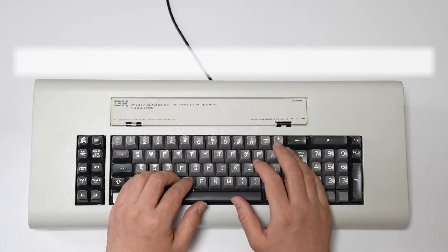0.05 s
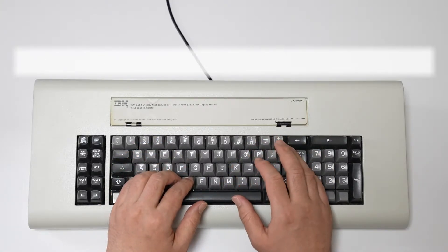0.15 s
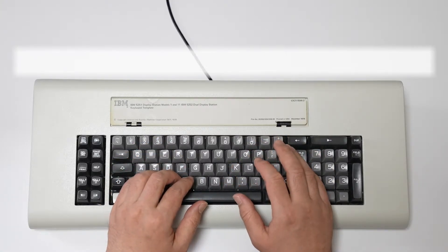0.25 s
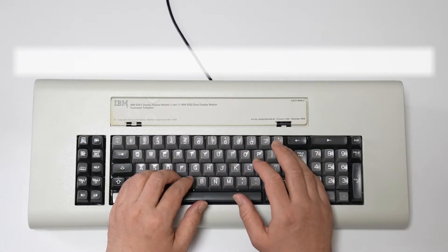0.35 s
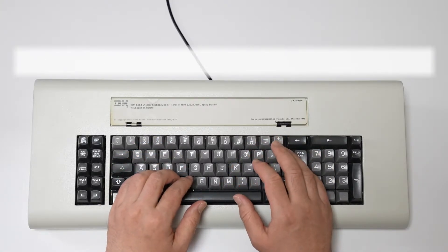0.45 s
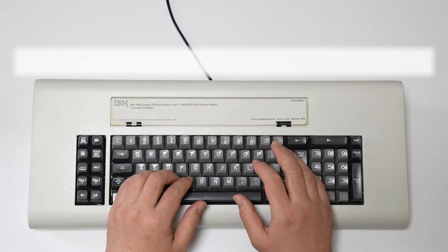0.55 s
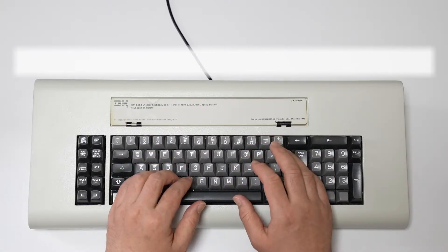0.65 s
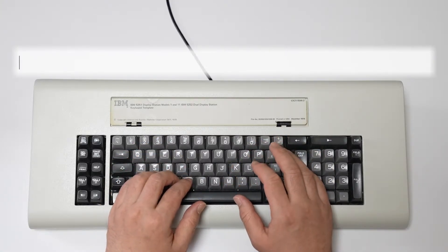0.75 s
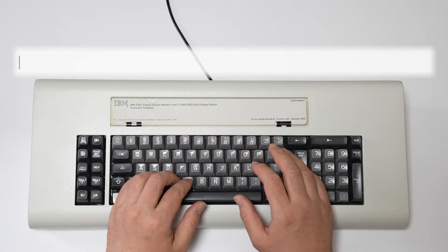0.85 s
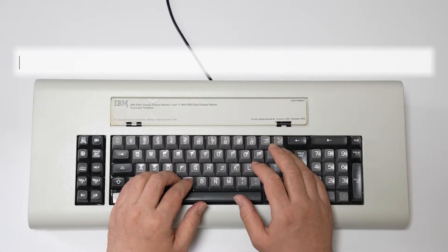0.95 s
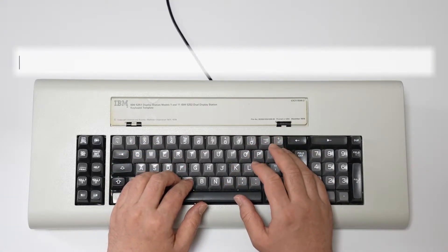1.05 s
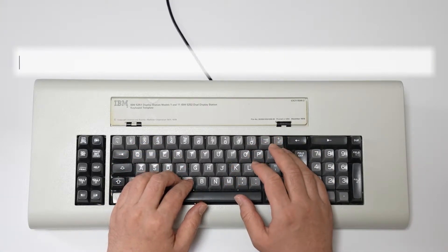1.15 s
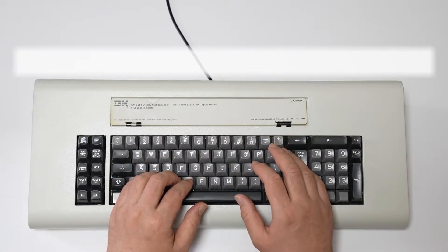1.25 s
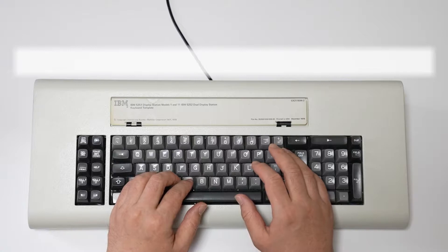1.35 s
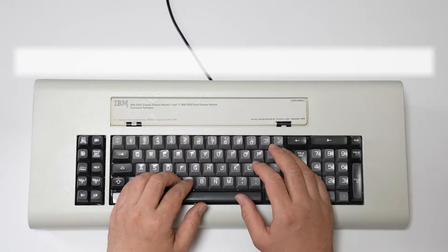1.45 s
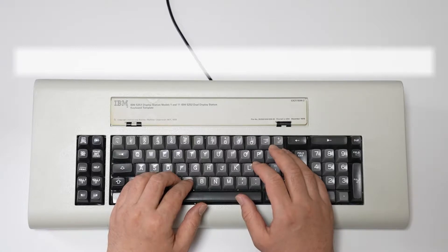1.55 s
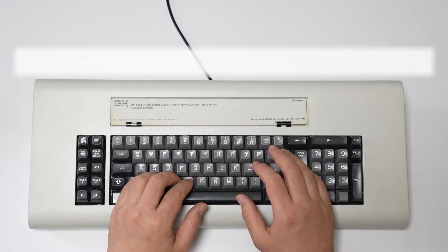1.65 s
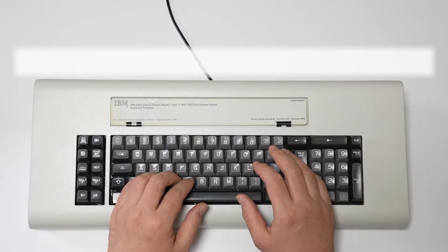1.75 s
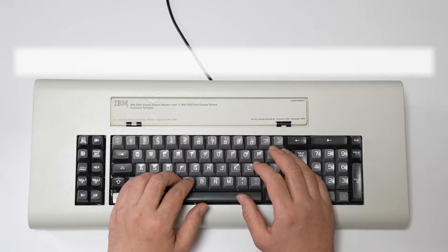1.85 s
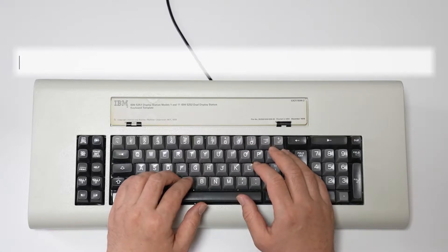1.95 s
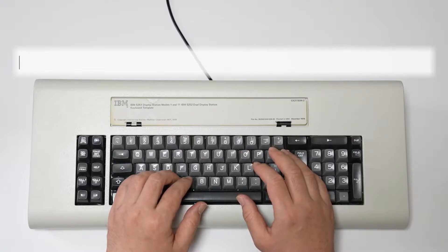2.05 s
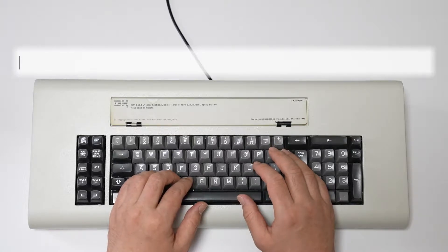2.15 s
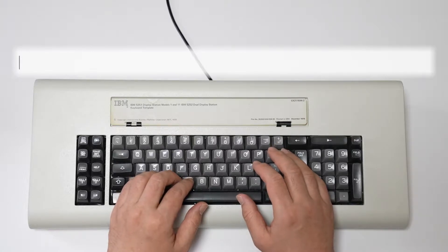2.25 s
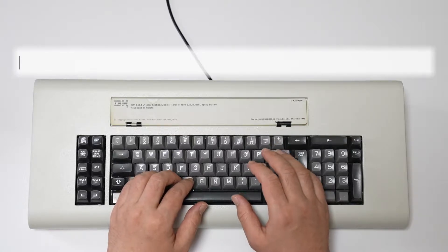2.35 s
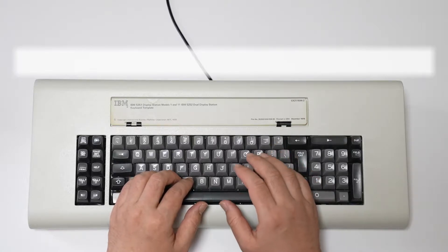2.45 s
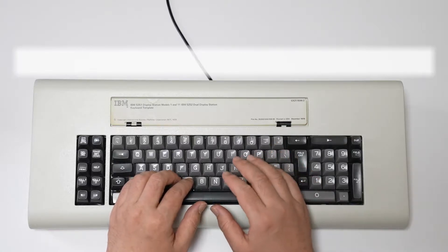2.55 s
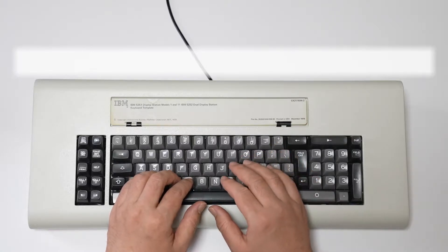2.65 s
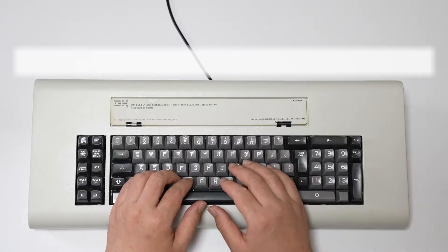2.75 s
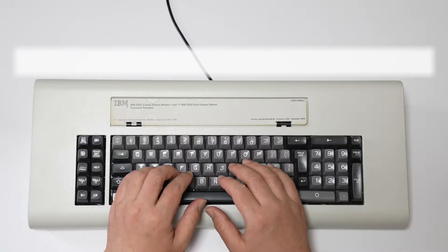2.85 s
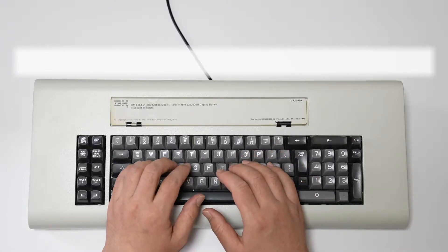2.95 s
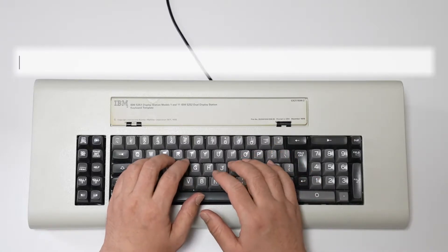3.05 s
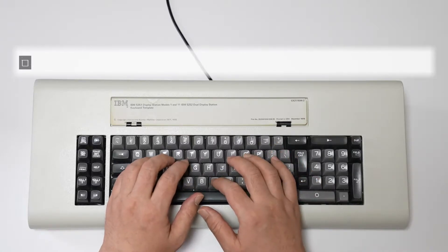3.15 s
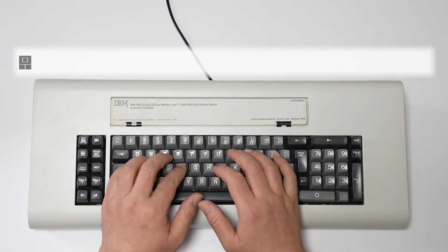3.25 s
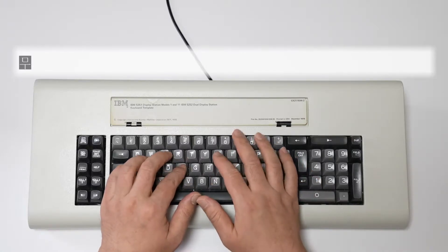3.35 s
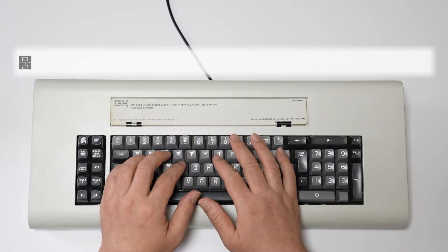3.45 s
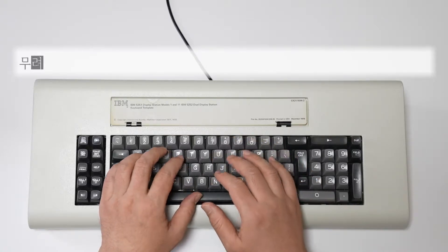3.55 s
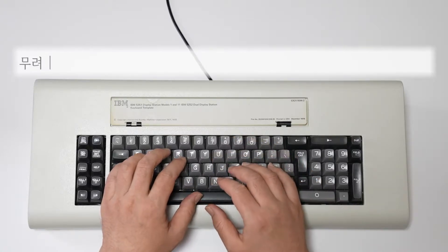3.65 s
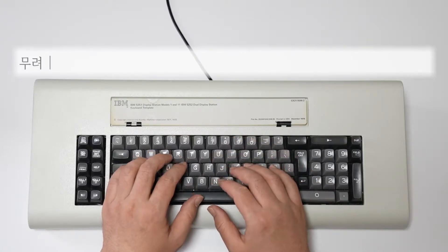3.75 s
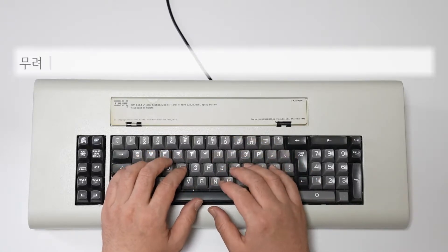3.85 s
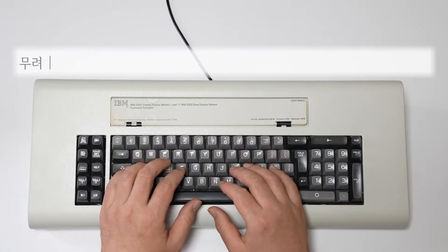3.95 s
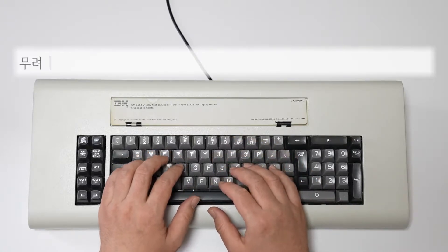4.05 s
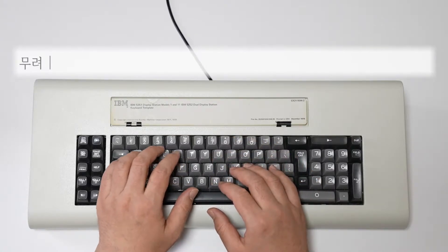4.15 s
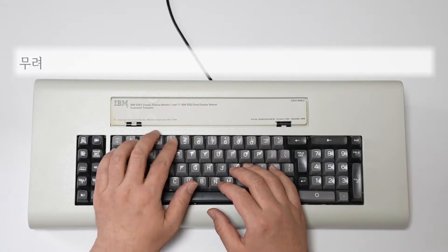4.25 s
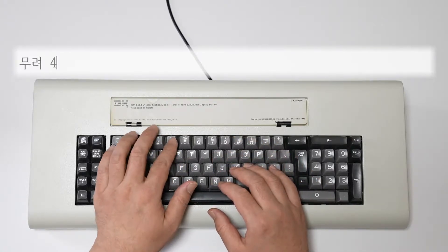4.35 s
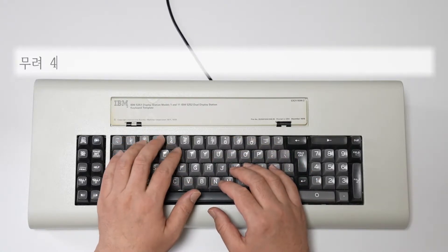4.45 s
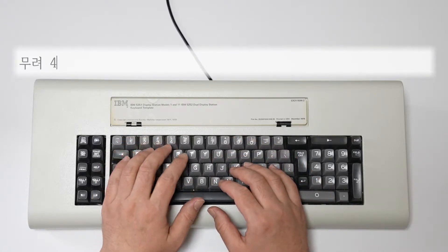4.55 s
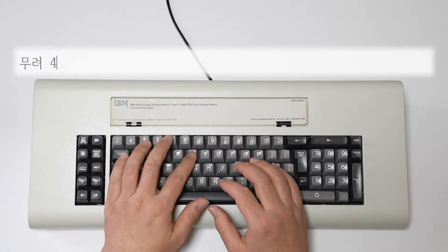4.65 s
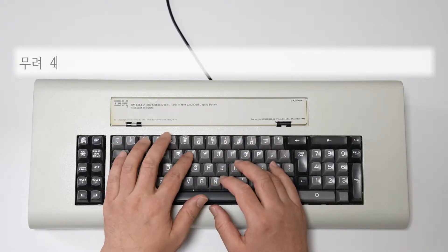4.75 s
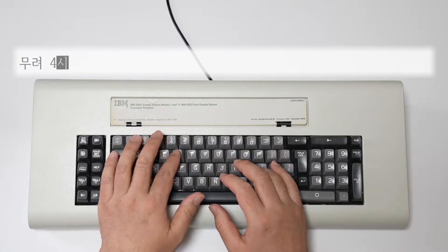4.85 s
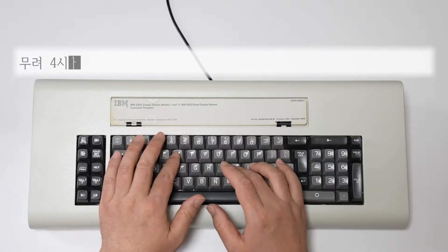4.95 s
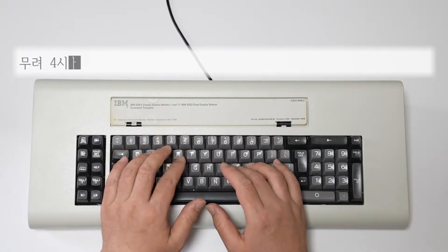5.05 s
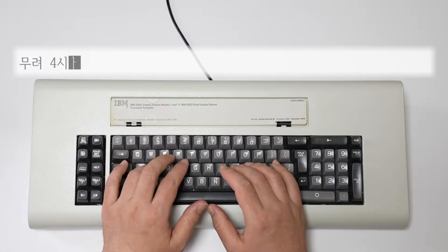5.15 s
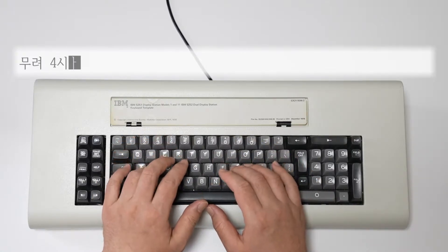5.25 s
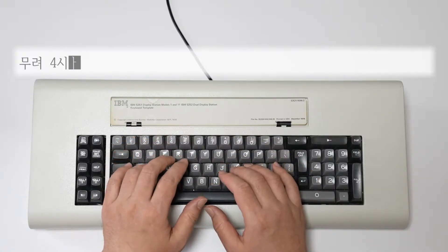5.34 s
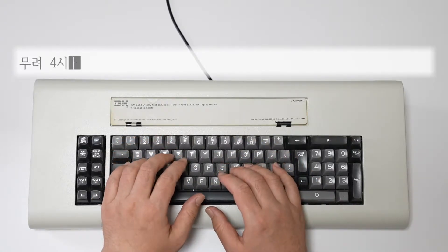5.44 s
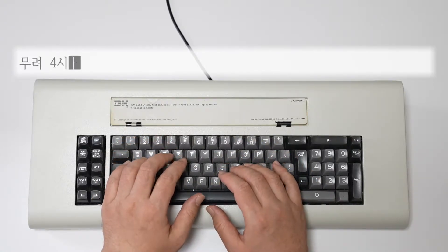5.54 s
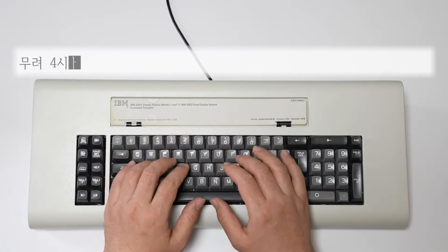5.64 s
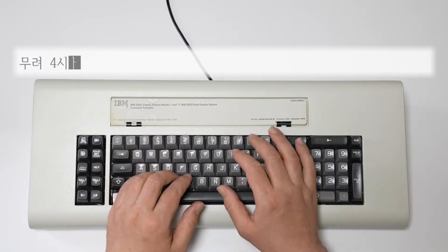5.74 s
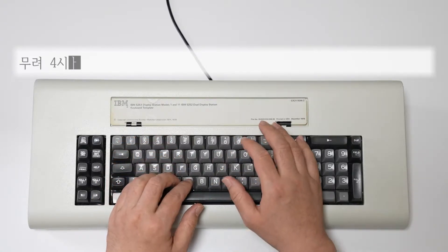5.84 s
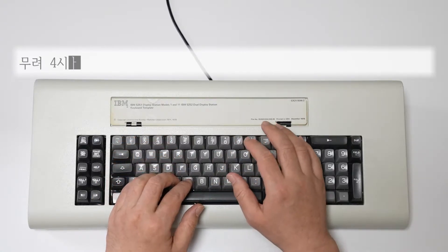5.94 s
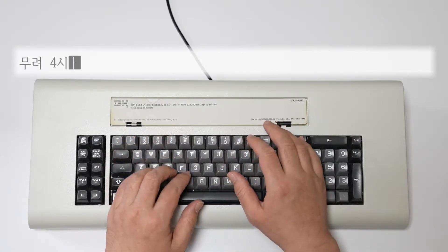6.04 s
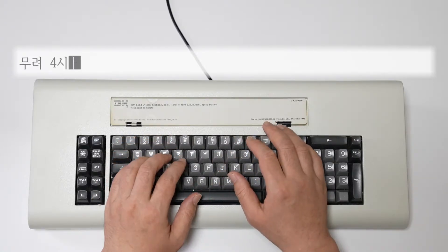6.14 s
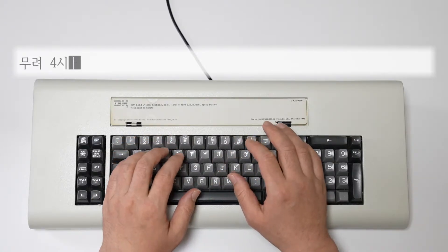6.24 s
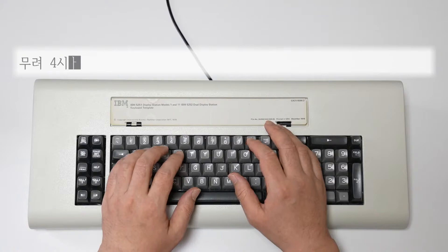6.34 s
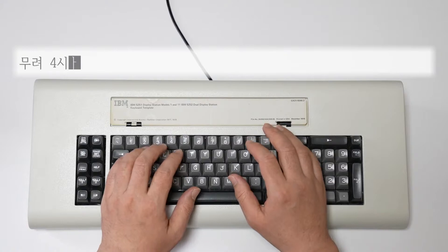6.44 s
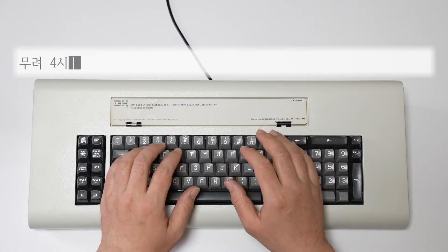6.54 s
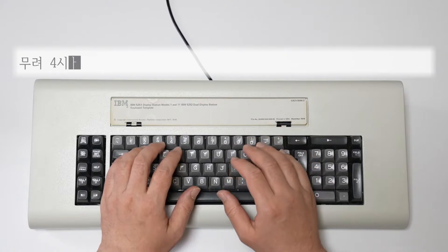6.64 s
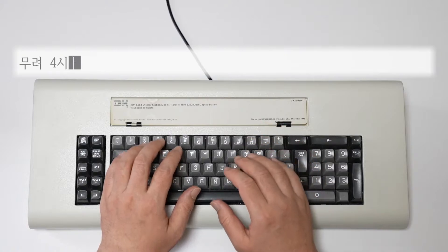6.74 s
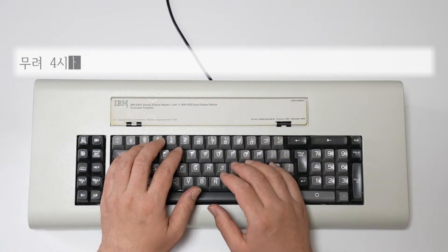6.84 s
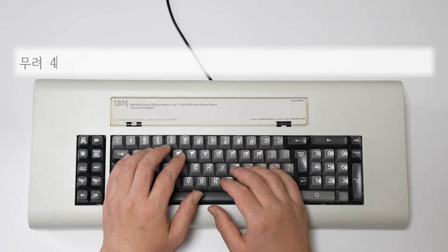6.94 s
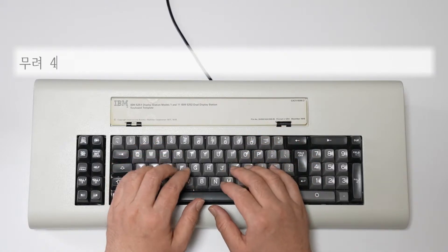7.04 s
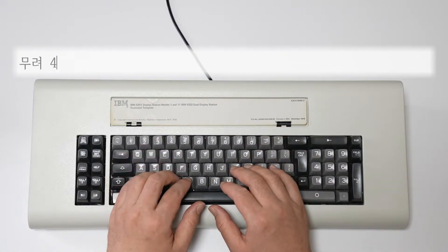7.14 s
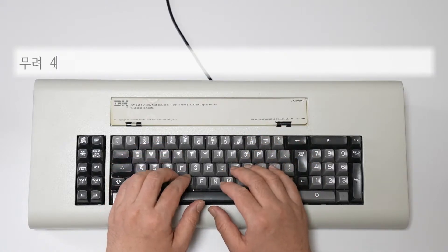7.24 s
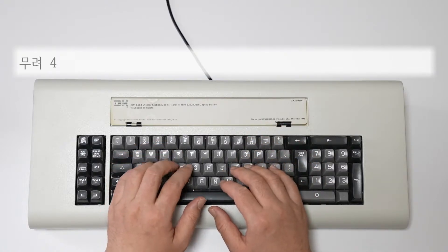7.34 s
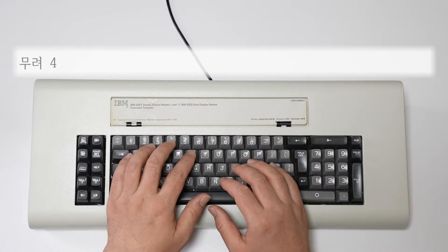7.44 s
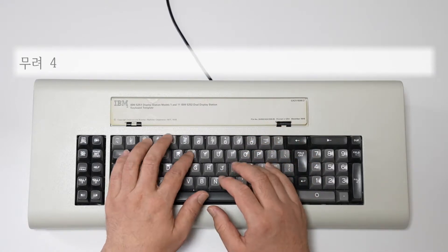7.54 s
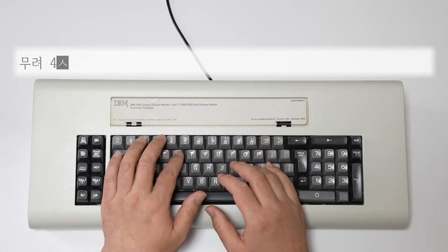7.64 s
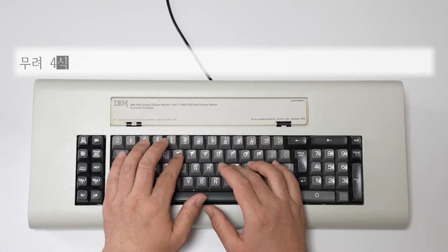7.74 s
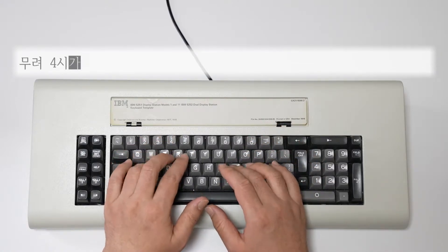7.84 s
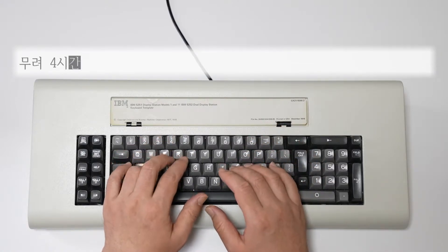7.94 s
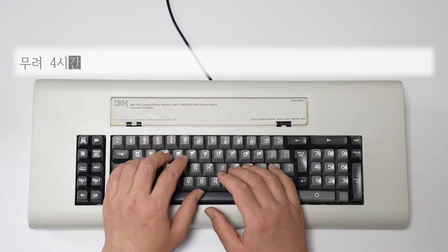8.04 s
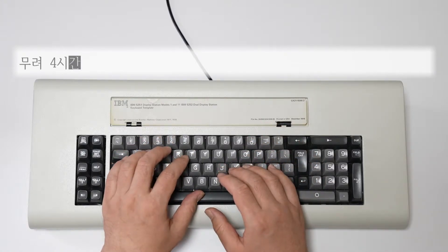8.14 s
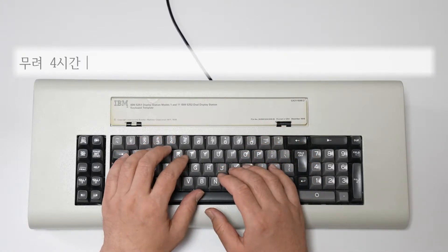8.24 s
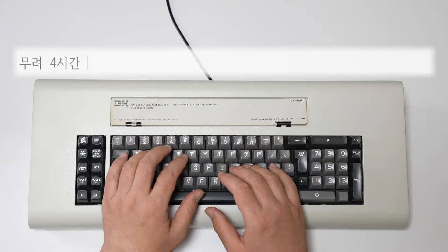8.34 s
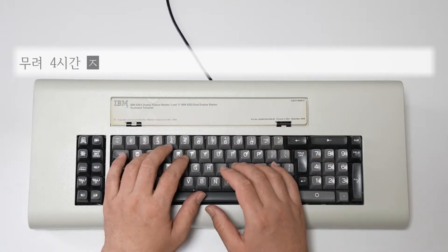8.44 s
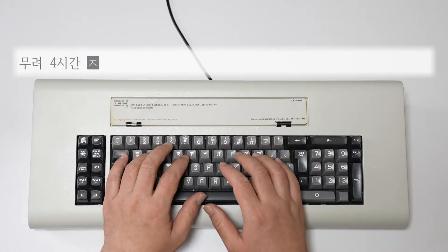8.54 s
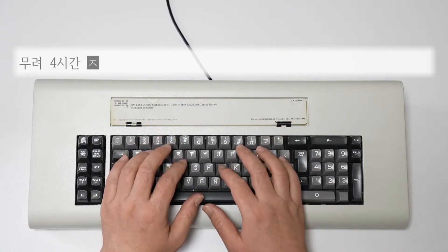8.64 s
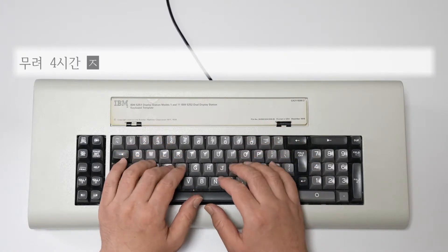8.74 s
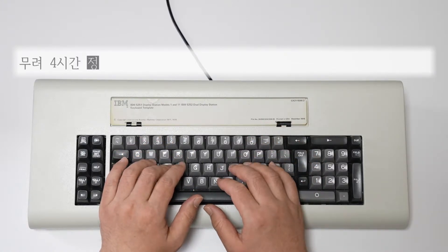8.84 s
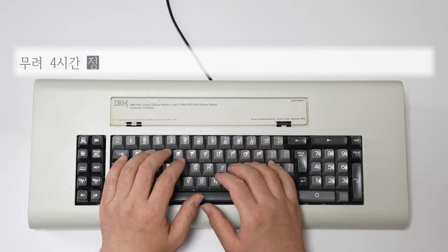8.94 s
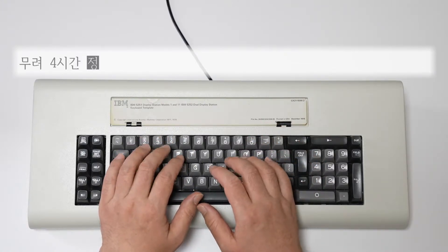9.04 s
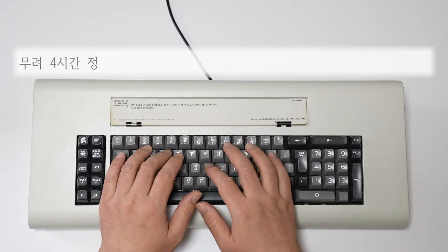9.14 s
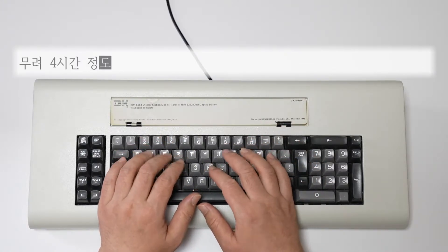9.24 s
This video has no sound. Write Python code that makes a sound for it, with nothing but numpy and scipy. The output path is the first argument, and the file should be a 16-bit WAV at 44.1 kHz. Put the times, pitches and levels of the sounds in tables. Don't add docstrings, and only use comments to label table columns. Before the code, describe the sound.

Close, dry, loud key clacks, each a snap down and a clack back up, with plastic, steel and thin spring ringing. After one early keystroke there is a long pause, then quick clusters, slower single strokes, and more clusters. Behind, muffled traffic, low engine drones, faint hum, a distant motor whine and soft hiss.

```python
import sys
import numpy as np
from scipy import signal
from scipy.fft import rfft, irfft, next_fast_len
from scipy.io import wavfile
from scipy.ndimage import uniform_filter1d

SR = 44100
rng = np.random.default_rng(int(sys.argv[2]) if len(sys.argv) > 2 else 0)


def generate_wav(signal):
    frames = np.transpose(np.atleast_2d(signal))
    scaled = np.clip(frames, -1, 1) * 32767
    pcm = np.round(scaled).astype(np.int16)
    wavfile.write(sys.argv[1], SR, pcm)


def gain_from_decibels(decibels):
    exponent = np.asarray(decibels, float) / 20
    return 10 ** exponent


N = 409688
RING = int(.22 * SR)

# pitch_hz, level_db (per Hz)
TRAFFIC_COLOUR = [(41, -38.5), (70, -4.5), (130, -4), (193, -9.5), (243, -3), (264, -16), (291, -5),
                  (331, -8.5), (378, -8), (410, -10), (524, -12), (829, -10.5), (1400, -17), (1550, -14.5),
                  (1750, -11.5), (2050, -17.5), (3500, -38.5), (4550, -55), (7700, -120)]
# pitch_hz, level_db (per Hz)
HISS_COLOUR = [(1470, -8), (2500, -3), (4240, -7.5), (6600, -7), (10900, -10.5), (13300, -9.5),
               (16000, -10.5)]
HISS_DB = -59.5
# pitch_hz, likeness (1 = same, 0 = unrelated)
LIKENESS = [(60, -0.37), (240, 0.049), (950, 0.338), (3770, 0.197), (15000, -0.0019)]
# closest_s, peak_db, rise_s, fall_s
TRAFFIC_PASSES = [
    (2.2, -63, 1.61, 2.87),
]
TRAFFIC_REST_DB = -51.5
# closest_s, peak_db, rise_s, fall_s
DEEP_PASSES = [
    (.35, -49, 0.265, 0.71),
    (1.5, -48.5, 0.274, 0.84),
]
DEEP_REST_DB = -57
# closest_s, peak_db, rise_s, fall_s
HIGHER_PASSES = [
    (1.4, -68, .15, .3),
    (5.7, -51, 0.9, 0.38),
    (8.8, -61, 0.29, 0.285),
]
HIGHER_REST_DB = -59.5
# pitch_hz, width_hz, level_db
ENGINE_DRONES = [(43.2, 2.88, -3.5), (57.97, 1, -3)]
# pitch_hz, width_hz, level_db
BUILDING_DRONE = [(28.2, 6.04, -56)]
# pitch_hz, level_db
MAINS = [(120, -60.5), (240, -68)]
# time_s, pitch_hz, level_db
FAR_MOTOR = [(0, 373.8, -100), (2.2, 385.3, -59.5), (2.6, 373.5, -64), (3.2, 368.4, -55), (3.7, 363.3, -55),
             (4.7, 350.8, -55.5), (5.2, 366, -70), (9.29, 358.2, -72.5)]

# pitch_hz, level_db, t60_s (time to fade by 60 dB)
CASE = [(396.6, -5.5, 0.1303), (465.9, -1.5, 0.0666), (598.8, -12, 0.241), (622, -5.5, 0.103)]
# pitch_hz, level_db, t60_s
CAP = [(856, -2, 0.0497), (846, -5.5, 0.103), (905, -2.5, 0.114), (980, -2, 0.072), (1130, -3, 0.074),
       (1225, 4, 0.0358), (1305.5, 4, 0.0346), (1600, -6, 0.159)]
# pitch_hz, level_db, t60_s
PLATE = [(2090, -18, 0.135), (2253, -5, 0.0416), (2524, -9.5, 0.0333), (2493, -6, 0.018),
         (2880, -2, 0.0187), (3120, -5.5, 0.025), (3293, -5.5, 0.0144), (3487, -3, 0.016),
         (3766, -12, 0.0183), (4209, -4, 0.0175), (4413, -4.5, 0.0196), (4910, -19.5, 0.051),
         (4907, -15.5, 0.074), (5354, -7, 0.0171)]
# pitch_hz, level_db, t60_s
LEAF = [(6590, 6, 0.0087), (8580, 7, 0.0265), (8310, 4, 0.046), (9340, 5.5, 0.03), (10870, 11.5, 0.035),
        (12250, 11, 0.0146), (10870, 13.5, 0.0098), (10580, 2.5, 0.101), (10723, 15, 0.0094),
        (11777, 18.5, 0.009)]
# pitch_hz, level_db, t60_s
DESK = [(204.5, 11.75, 0.231), (269.9, 15.3, 0.277)]
# low_hz, high_hz, part_db, crack_db, crack_t60_s, tail_db, tail_t60_s, side_db
CASE_WASH = (323.5, 652, 10, -11.5, 0.2023, -2, 0.17, -17.5)
CAP_WASH = (725, 1985.5, 3.5, 2.5, 0.0662, 5, 0.1919, -16.5)
PLATE_WASH = (1991, 5795.5, 6, 4, 0.0011, -4.5, 0.1916, -13.5)
LEAF_WASH = (5500, 13000, 4.5, 2.5, 0.1478, -13.5, 0.5155, -2.5)
DESK_WASH = (169, 301.5, -13.5, -5, -8, -17, -2, -31)

# start_s, stroke_db, case_thud_db (next to stroke), cap_pitch_hz, plate_pitch_hz
SNAPS = [(.144, -21, -19, 1300, 2090), (3.081, -24, -11.5, 1190, 2084), (3.339, -20, -14.5, 1130, 5410),
         (3.421, -22, 3.5, 1335, 2780), (4.731, -21, -1.5, 1274, 2090), (4.826, -22.5, -8, 817, 2997),
         (5.016, -24.5, -4, 980, 2186), (5.249, -21.5, -14, 832, 3280), (5.888, -26.5, -6, 800, 2310),
         (6.377, -21.5, -29, 787, 2280), (7.708, -22, -1, 846, 4270), (7.797, -25, -32.5, 980, 2150),
         (8.071, -23, -9, 839, 4699), (8.505, -22.5, -4.5, 1347, 3180), (8.635, -23, -9, 1187, 1960),
         (8.657, -23, -3.5, 815, 2777), (9.202, -21, 0.5, 833, 2880)]
CRACKS = [(3.173, -23, -9.5, 1216, 2250), (3.614, -22.5, -10.5, 1226, 3450), (4.352, -27, -7, 1200, 2160),
          (6.066, -25, -12.5, 1410, 2424), (7.539, -18.5, -2, 1332, 2240), (8.144, -20.5, -10, 1196, 3330),
          (9.155, -20.5, -12, 1323, 3760)]
CLACKS = [(3.206, -23, -11, 1013, 3120), (3.454, -25, -8, 810, 2680), (3.529, -23, -11, 1358, 2970),
          (3.7045, -25, -10.5, 1332, 3180), (4.818, -24, -4, 960, 3090), (5.117, -21.5, -11, 826, 2640),
          (5.382, -20, -12, 835, 3070), (6.181, -22.5, -13.5, 825.4, 2360),
          (6.496, -24.5, -13.5, 868.8, 3075), (7.649, -21, -8, 980, 3290), (7.8025, -23, -2, 1153, 4280),
          (7.913, -21, -7.5, 980, 3267), (8.771, -22, -6, 1130, 2200), (8.8, -20.5, -6.5, 954, 3480),
          (8.92, -18, -11, 898, 2530), (9.232, -21.5, -9.5, 898, 2850)]
SLAPS = [(.281, -22, -15.5, 780, 2900), (3.251, -19.5, -9.5, 870, 2530), (4.444, -27.5, -10, 1270, 3040),
         (4.91, -22.5, -8.5, 1045, 3130), (5.982, -24, -14, 1414, 2836), (7.614, -19, -10, 1300, 3060),
         (7.722, -24, -30, 1300, 3150), (8.233, -24.5, -11, 1225, 4270)]
# start_s, stroke_db, case_thud_db (next to stroke), cap_pitch_hz
TOUCHES = [(.213, -40, -10.5, 1300), (.277, -36.5, -10.5, 900), (3.058, -33, 2, 774),
           (3.16, -28.5, -4, 1178), (3.298, -43, -12, 966), (4.34, -26, -10, 1064),
           (4.721, -36.5, -10, 1290), (5.001, -25.5, -4, 1050), (5.04, -49.5, -5, 781),
           (5.193, -27, -9, 840), (5.874, -30, -14, 855), (6.037, -39.5, -3.5, 940),
           (6.353, -31, -13.5, 980), (7.167, -30.5, -16.5, 1189), (7.18, -26.5, -12.5, 830),
           (7.194, -51.5, -0.5, 800), (7.529, -36.5, -9.5, 890), (7.698, -34.5, -13.5, 1000),
           (7.787, -24, -9.5, 1060), (7.892, -28.5, -1.5, 1263), (8.494, -42, -2, 894),
           (8.709, -37, -8.5, 980), (8.767, -28.5, -6, 779.4), (9.14, -36, -20, 946)]
# start_s, stroke_db, leaf_snap_db (next to stroke), plate_pitch_hz
KNOCKS = [(3.324, -22, 4, 5370), (3.592, -26.5, -22, 3340), (3.691, -38, -4.5, 3250),
          (4.797, -19, -14, 3450), (4.904, -43, -1, 3250), (7.689, -46, 1.5, 4040),
          (7.696, -37.5, -14, 4200), (8.126, -22, -17, 3400), (8.229, -28, -6, 2226)]
# cap_db, plate_db, leaf_db
SNAP_SHARE = (0.82, -4.5, -3)
CRACK_SHARE = (0.58, -3.5, -0.62)
CLACK_SHARE = (0.07, -3, -7.5)
SLAP_SHARE = (-0.156, 0.13, -6)
TOUCH_SHARE = (-.1, -11, -16)
TOUCH_PLATE_HZ = 2115
KNOCK_CAP_DB, KNOCK_CASE_DB, KNOCK_CAP_HZ = -12.5, -27.5, 1300

# start_s, plate_db, leaf_db
IMPACTS = [(0.1438, -27, -27), (0.145, -39.5, -24.5), (0.1551, -26.5, -36.5), (0.2817, -18.5, -27.5),
           (0.295, -36.5, -44), (3.0817, -28, -25.5), (3.0827, -23, -29.5), (3.0869, -30.5, -35.5),
           (3.1737, -20.5, -20.5), (3.208, -23, -32), (3.2107, -27.5, -31), (3.2123, -23.5, -33.5),
           (3.2177, -29.5, -42), (3.2221, -32, -45), (3.2503, -19.5, -25.5), (3.2518, -20, -39),
           (3.3237, -25, -22.5), (3.3386, -36, -19), (3.3397, -19, -36.5), (3.4217, -29, -22),
           (3.4237, -19, -30.5), (3.4536, -24, -28), (3.4603, -25, -33.5), (3.4659, -28, -34.5),
           (3.5284, -31.5, -34), (3.5294, -25.5, -29.5), (3.5303, -25, -37), (3.5314, -21.5, -38),
           (3.5382, -28.5, -46.5), (3.5929, -16, -41), (3.6019, -28, -46.5), (3.6036, -34, -46.5),
           (3.6087, -27.5, -42.5), (3.6123, -19, -17), (3.6353, -29.5, -37.5), (3.7026, -33, -39.5),
           (3.7067, -26.5, -33), (3.7089, -27, -32.5), (3.7141, -28, -46.5), (3.7161, -39.5, -44.5),
           (4.352, -24, -22), (4.3583, -25, -42), (4.363, -30.5, -35), (4.443, -26.5, -27),
           (4.4447, -25, -36.5), (4.4465, -27.5, -38.5), (4.4529, -27.5, -36),
           (4.7322, -18.5, -22.5), (4.796, -32, -43), (4.7977, -31.5, -39), (4.7982, -26, -43),
             (4.8183, -20, -22), (4.8257, -18.5, -24.5), (4.8275, -20, -29), (4.836, -36.5, -41),
             (4.8373, -35.5, -38), (4.844, -36.5, -44), (4.91, -19.5, -31), (4.9142, -23, -28.5),
             (4.9184, -25.5, -30), (4.9222, -26.5, -43.5), (4.926, -41, -44.5), (4.9305, -33, -43),
             (5.0003, -25, -48), (5.017, -19, -25), (5.1167, -30.5, -29), (5.1181, -21, -29),
             (5.1267, -34, -39.5), (5.1308, -32.5, -43), (5.2487, -20.5, -21), (5.383, -21, -27),
             (5.8883, -24.5, -25), (5.8937, -27.5, -38.5), (5.8973, -30.5, -41), (5.9826, -23.5, -26.5),
             (5.9831, -20, -29.5), (5.9919, -28.5, -43), (5.9962, -30.5, -42), (6.0666, -24, -21.5),
             (6.0761, -26.5, -40), (6.1807, -23.5, -37), (6.1829, -21, -28), (6.1844, -24.5, -31.5),
             (6.1923, -33.5, -42), (6.1964, -30.5, -44), (6.3778, -20, -21), (6.4952, -31.5, -32.5),
             (6.4967, -25.5, -33.5), (6.4993, -25, -32), (6.4999, -31, -38.5), (6.506, -30, -38.5),
           (7.539, -20.5, -19.5), (7.543, -21, -31), (7.55, -39, -38.5), (7.6135, -12.5, -20.5),
             (7.6488, -33, -24), (7.6497, -19, -25), (7.6599, -33, -43.5), (7.7091, -19, -22),
             (7.7155, -28, -41), (7.7221, -20.5, -35), (7.727, -20.5, -31), (7.7323, -31, -31),
             (7.7861, -27, -40.5), (7.7974, -18.5, -42), (7.8008, -29.5, -31), (7.803, -18, -21),
             (7.8921, -28, -37.5), (7.9134, -23, -22.5), (7.917, -20.5, -38.5), (7.925, -38.5, -33),
             (8.0721, -31, -25.5), (8.0735, -22, -37), (8.0825, -27, -41), (8.1272, -16, -32.5),
             (8.135, -30.5, -46), (8.1388, -30.5, -47.5), (8.145, -21, -16.5), (8.168, -30, -41.5),
             (8.2294, -26, -32), (8.2319, -25, -26.5), (8.234, -18.5, -35.5), (8.2456, -33, -43.5),
             (8.2516, -31.5, -47.5),
           (8.5063, -22, -19.5), (8.6334, -19.5, -28.5), (8.6384, -22.5, -23), (8.6406, -33, -34.5),
             (8.6434, -22.5, -39), (8.645, -29.5, -37.5), (8.6472, -30, -40.5), (8.6574, -17.5, -19),
             (8.7661, -23, -35.5), (8.7704, -25, -26), (8.7721, -25, -38), (8.7733, -21, -37),
             (8.781, -32, -47), (8.783, -28.5, -40.5), (8.7995, -24, -26.5), (8.8015, -30, -32),
             (8.8049, -25, -31), (8.8061, -22.5, -37), (8.8132, -31, -45), (8.8168, -30, -46),
             (8.8181, -29.5, -45.5), (8.9195, -19, -27), (8.9297, -36.5, -34.5), (8.9326, -40, -32.5),
             (9.1556, -19.5, -17), (9.202, -21, -23.5), (9.2045, -20, -28), (9.2136, -35, -44),
             (9.2332, -24, -32.5), (9.236, -27.5, -28), (9.2382, -24, -32.5), (9.24, -25, -38.5),
             (9.2439, -26.5, -36), (9.2482, -33, -40.5), (9.2518, -30.5, -43.5)]
IMPACT_LEAD_S, IMPACT_LATE_S, IMPACT_SPAN_S = .002, .0045, .035
PLATE_PER_IMPACT_DB, LEAF_PER_IMPACT_DB = -6.5, -4.0

# start_s, level_db, pitch_hz, t60_s
SPRINGS = [(.146, -48, 3577, 0.296), (3.082, -32, 7580, 0.0548), (3.592, -35, 4430, 0.23),
           (3.594, -31, 4654, 0.124), (8.129, -36, 3330, 0.18), (8.13, -41, 4480, 0.2),
           (.282, -26.5, 852.5, 0.251), (3.34, -36, 589.6, 0.6), (3.613, -28.5, 1225, 0.118),
           (4.825, -38, 937, 0.56), (4.915, -42.5, 1011, 0.48), (5.03, -31.5, 583, 0.184),
           (5.255, -36.5, 572.3, 0.525), (5.385, -40.5, 860, 0.39), (6.19, -44.5, 890, 0.82),
           (6.38, -30, 831.4, 0.12), (6.5, -42.5, 870, 0.318), (7.92, -45.5, 379.6, 0.71),
           (8.15, -37.5, 1193, 0.175), (8.924, -40.5, 905, 0.46), (3.261, -36, 970, 0.256),
           (5.891, -36.5, 300, 0.23), (8.51, -40.5, 389.2, 0.44), (8.665, -40, 1009, 0.35),
           (8.81, -35.5, 622, 0.364), (9.004, -53, 5840, 0.11), (9.238, -42, 903, 0.38)]
# start_s, level_db, pitch_hz, t60_s
NOTES = [(0.2817, -20, 2930, 0.029), (3.25, -18, 2120, 0.0325), (3.345, -34.5, 391, 0.21),
         (3.421, -16.5, 461, 0.0586), (3.529, -20.5, 3020, 0.024), (3.591, -24, 3140, 0.027),
         (4.345, -27, 590, 0.11), (4.358, -32, 2500, 0.05), (4.444, -33, 395, 0.122),
         (4.797, -33.5, 3620, 0.048), (5.982, -21, 2980, 0.0266), (6.182, -26, 1400, 0.037),
         (6.38, -37.5, 270, 0.157), (6.378, -31, 11900, .06), (3.251, -20, 2900, 0.028),
         (7.613, -15, 2830, 0.0168), (8.127, -15, 3360, 0.0205), (8.507, -22, 870, 0.0237),
         (8.506, -26, 640, 0.055), (9.202, -22, 550, 0.054), (5.889, -31, 409, 0.076),
         (3.422, -18.5, 586, 0.065)]
DAMP_AFTER_S, DAMP_OVER_DB, DAMP_S = .07, -35, .008


def rms_one(x):
    return x / np.sqrt(np.mean(x ** 2) + 1e-20)


def spread(mid, side):
    return np.array([mid + side, mid - side])


def coloured(spectrum):
    size = next_fast_len(N)
    log_hz = np.log(np.maximum(np.arange(size // 2 + 1) * SR / size, 1))
    points, like = np.array(spectrum), np.array(LIKENESS)
    gain = gain_from_decibels(np.interp(log_hz, np.log(points[:, 0]), points[:, 1]))
    alike = np.clip(np.interp(log_hz, np.log(like[:, 0]), like[:, 1]), -1, 1)
    mid, side = rfft(rng.standard_normal((2, size))) * gain
    stereo = spread(np.sqrt(1 + alike) * mid, np.sqrt(1 - alike) * side)
    return rms_one(irfft(stereo, size)[:, :N])


def swells(passes, rest_db):
    t = np.arange(N) / SR
    gain = gain_from_decibels(rest_db)
    for closest_s, peak_db, rise_s, fall_s in passes:
        width_s = np.where(t < closest_s, rise_s, fall_s)
        gain = gain + gain_from_decibels(peak_db) * np.exp(-((t - closest_s) / width_s) ** 2)
    return gain


def traffic():
    return swells(TRAFFIC_PASSES, TRAFFIC_REST_DB) * coloured(TRAFFIC_COLOUR)


def drone(hz, width_hz):
    r = np.exp(-np.pi * width_hz / SR)
    poles = [1, -2 * r * np.cos(2 * np.pi * hz / SR), r * r]
    noise = rng.standard_normal((2, N + SR))
    tone = rms_one(signal.lfilter([1, 0, -1], poles, noise)[:, SR:])
    size_now = np.sqrt(uniform_filter1d(tone ** 2, size=SR // 12))
    return rms_one(tone / (0.54 + size_now))


def heavy_vehicles():
    deep, higher = [gain_from_decibels(db) * drone(hz, width_hz) for hz, width_hz, db in ENGINE_DRONES]
    deep_side = 0.72 * deep[0] + 0.64 * np.roll(deep[0], SR // 176) + 0.36 * deep[1]
    higher_side = 2.0 * np.roll(higher[0], SR // 238) + 0.275 * higher[1]
    low = swells(DEEP_PASSES, DEEP_REST_DB) * spread(deep[0], deep_side)
    return low + swells(HIGHER_PASSES, HIGHER_REST_DB) * spread(higher[0], higher_side)


def building_drone():
    return sum(gain_from_decibels(db) * drone(hz, width_hz) for hz, width_hz, db in BUILDING_DRONE)


def mains_hum():
    t = np.arange(N) / SR
    return sum(gain_from_decibels(db) * np.sin(2 * np.pi * hz * t) for hz, db in MAINS)


def microphone_hiss():
    return gain_from_decibels(HISS_DB) * coloured(HISS_COLOUR)


def add(out, sound, s):
    at = int(s * SR)
    out[:, at:at + sound.shape[1]] += sound[:, :N - at]


def fading(t60, size=RING):
    return gain_from_decibels(-60 * np.arange(size) / SR / t60)


def contacts():
    touches = [tuple(row) + (TOUCH_PLATE_HZ,) for row in TOUCHES]
    kinds = [(SNAPS, SNAP_SHARE), (CRACKS, CRACK_SHARE), (CLACKS, CLACK_SHARE),
             (SLAPS, SLAP_SHARE), (touches, TOUCH_SHARE)]
    rows = []
    for table, (cap, plate, leaf) in kinds:
        for s, db, thud, cap_hz, plate_hz in table:
            rows.append((s, db + cap, db + thud, db + plate, db + leaf, cap_hz, plate_hz))
    for s, db, leaf, plate_hz in KNOCKS:
        rows.append((s, db + KNOCK_CAP_DB, db + KNOCK_CASE_DB, db, db + leaf, KNOCK_CAP_HZ, plate_hz))
    return rows


def impacts(s, next_s, plate_db, leaf_db):
    rows = np.array(IMPACTS)
    end_s = min(next_s - IMPACT_LEAD_S, s + IMPACT_SPAN_S)
    rows = rows[(rows[:, 0] >= s - IMPACT_LEAD_S) & (rows[:, 0] < end_s)]
    if not np.any(rows[:, 0] < s + IMPACT_LATE_S):
        single = [s, plate_db - PLATE_PER_IMPACT_DB, leaf_db - LEAF_PER_IMPACT_DB]
        rows = np.vstack([[single], rows])
    start = rows[:, 0].min()
    trains = np.zeros((2, int(.04 * SR)))
    at = ((rows[:, 0] - start) * SR).astype(int)
    trains[:, at] = gain_from_decibels(rows[:, 1:].T) * (-1) ** np.arange(len(rows))
    plate_sum, leaf_sum = 10 * np.log10(np.sum(trains ** 2, axis=1))
    return start, trains[0], plate_sum + PLATE_PER_IMPACT_DB, trains[1], leaf_sum + LEAF_PER_IMPACT_DB


def evened(clicks, width_hz):
    size = 2 * next_fast_len(len(clicks))
    tones = rfft(clicks, size)
    colour = uniform_filter1d(np.abs(tones) ** 2, size=int(width_hz * size / SR))
    fold = irfft(np.log(colour + 1e-9) / 2, size)
    fold[1:size // 2] *= 2
    fold[size // 2 + 1:] = 0
    return irfft(tones / np.exp(rfft(fold)), size)[:len(clicks)]


def flurry(ms, train):
    when, size = rng.random((2, 12))
    clicks = np.zeros(int(.04 * SR))
    late = np.arange(12) >= 6
    after_ms = np.clip(np.where(late, 4 + 28 * when, when * ms + .2), 0, 39)
    strength = (size - .5) * gain_from_decibels(-9 * when - 17.8 * late)
    np.add.at(clicks, (after_ms * SR / 1000).astype(int), strength)
    clicks[0] += .42
    clicks = evened(signal.fftconvolve(clicks, train), width_hz=997)
    return clicks / np.sqrt(np.sum(clicks ** 2))


def felt(clicks, hz, t60):
    tones = np.abs(rfft(clicks)) ** 2
    away_hz = np.arange(len(tones)) * SR / len(clicks) - hz
    near = 1 / (1 + (away_hz * t60 * np.pi / np.log(1000)) ** 2) ** 2
    return np.sqrt(np.sum(tones * near, axis=1, keepdims=True) / np.sum(near, axis=1, keepdims=True))


def favour(modes, hz, boost_db, reach):
    distance = np.log(np.array(modes)[:, :1] / hz) / reach
    return boost_db * np.exp(-distance ** 2)


def part(modes, wash, uneven_db, detune, flurry_ms, train, tick_db, lean_db=0):
    low_hz, high_hz, part_db, crack_db, crack_t60, tail_db, tail_t60, side_db = wash
    hz, level_db, t60 = np.transpose(modes)[:, :, None]
    t = np.arange(RING // 2) / SR
    luck = rng.standard_normal((4, len(modes), 1))
    hz = hz * (1 + detune * luck[0])
    phase = 2 * np.pi * hz * t
    clicks = flurry(flurry_ms, train)
    rings = gain_from_decibels(level_db + lean_db + uneven_db * luck[1] - 60 * t / t60)
    rings = rings / (0.201 + felt(clicks, hz, t60))
    mid, side = np.zeros((2, RING))
    mid[:len(t)] = np.sum(rings * np.sin(phase), axis=0)
    side[:len(t)] = np.sum(rings * luck[2] * np.sin(phase + luck[3]), axis=0)

    band = signal.butter(2, [low_hz, min(high_hz, .45 * SR)], "band", fs=SR, output="sos")
    dense = rms_one(signal.sosfilt(band, rng.standard_normal((4, RING))))
    tick = gain_from_decibels(tick_db) * signal.sosfilt(band, np.arange(RING) == 0)
    crack = gain_from_decibels(crack_db) * fading(crack_t60) * dense[:2]
    mode_colour = np.abs(rfft(mid * fading(0.071)))
    tinted = rms_one(irfft(rfft(dense[2:]) * mode_colour, RING))
    tail = gain_from_decibels(tail_db) * fading(tail_t60) * (1 - fading(0.0103))
    tail = tail * (.5 * tinted + 0.36 * dense[2:])

    blow = spread(mid + crack[0] + tick, gain_from_decibels(side_db) * (side + crack[1]))
    blow = signal.fftconvolve(blow, clicks[None])[:, :RING]
    return gain_from_decibels(part_db) * rms_one(blow + spread(tail[0], gain_from_decibels(side_db + 9.5) * tail[1])) * 0.0686


def leaf_spring(snaps, bright):
    lean_db = np.where(np.array(LEAF)[:, :1] > 1e4, -16 * (1 - bright), -8 * bright)
    leaf = part(LEAF, LEAF_WASH, uneven_db=1.5, detune=0.0162, flurry_ms=2.2,
                train=snaps, tick_db=29, lean_db=lean_db)
    dull = signal.lfilter(*signal.butter(2, 7000 + 10000 * bright, fs=SR), leaf)
    return dull * np.std(leaf) / np.std(dull)


def keys():
    board, desk = np.zeros((2, N)), np.zeros((2, N))
    times = np.array([row[0] for row in contacts()] + [2 * N / SR])
    for s, cap_db, thud_db, clack_db, snap_db, cap_hz, plate_hz in contacts():
        next_s = np.min(times[times > s])
        s, train, clack_db, snaps, snap_db = impacts(s, next_s, clack_db, snap_db)
        bright = np.clip((snap_db - clack_db + 6.5) / 8, 0, 1)
        early = train * fading(0.08, size=len(train))

        body = gain_from_decibels(snap_db) * leaf_spring(snaps, bright)
        case_lean = favour(CASE, 425, boost_db=0.252 * (thud_db + 42.5), reach=0.17)
        body += gain_from_decibels(thud_db) * part(CASE, CASE_WASH, uneven_db=1.5, detune=0.0067, flurry_ms=0.27,
                                    train=early, tick_db=15.5, lean_db=case_lean)
        cap_lean = favour(CAP, cap_hz, boost_db=11.5, reach=0.0577)
        body += gain_from_decibels(cap_db) * part(CAP, CAP_WASH, uneven_db=1.17, detune=0.00924, flurry_ms=0.64,
                                   train=early, tick_db=24.5, lean_db=cap_lean)
        plate_lean = favour(PLATE, plate_hz, boost_db=9.5, reach=0.0667)
        body += gain_from_decibels(clack_db) * part(PLATE, PLATE_WASH, uneven_db=1.15, detune=0.01255, flurry_ms=1.2,
                                     train=train, tick_db=20.5, lean_db=plate_lean)
        add(board, body, s)
        thump = gain_from_decibels(cap_db) * part(DESK, DESK_WASH, uneven_db=5.0, detune=0.0153, flurry_ms=1.55,
                                   train=early, tick_db=-9)
        add(desk, thump, s + 0.00239)
    thin = signal.sosfilt(signal.butter(4, 372.6, "high", fs=SR, output="sos"), board)
    return thin + signal.sosfilt(signal.butter(4, 150, "high", fs=SR, output="sos"), desk)


def springs():
    out, t = np.zeros((2, N)), np.arange(3 * RING) / SR
    firm = np.array([row[0] for row in contacts() if row[1] > DAMP_OVER_DB] + [2 * N / SR])
    for s, level_db, hz, t60 in SPRINGS + NOTES:
        free_s = np.min(firm[firm > s + DAMP_AFTER_S]) - s
        ping = np.sin(2 * np.pi * hz * t)
        ping += 0.5 * np.sin(2 * np.pi * hz * 1.012 * t + 5.94 * rng.random())
        ping *= gain_from_decibels(level_db) * fading(t60, size=len(t))
        ping *= 1 - fading(min(.016, 0.112 * t60), size=len(t))
        ping *= np.clip((free_s - t) / DAMP_S, 0, 1)
        add(out, spread(ping, -.1 * ping) * np.cos(np.pi / 2 * t / t[-1]), s)
    return out


def far_motor():
    s, motor_hz, motor_db = np.transpose(FAR_MOTOR)
    t = np.arange(N) / SR
    hz, level_db = np.interp(t, s, motor_hz), np.interp(t, s, motor_db)
    return gain_from_decibels(level_db) * np.sin(2 * np.pi * np.cumsum(hz) / SR) * [[1.4], [.6]]


def scene():
    behind = traffic() + heavy_vehicles() + building_drone() + mains_hum() + microphone_hiss()
    keyboard = (keys() + springs()) * gain_from_decibels(np.array([[-.45], [.45]]))
    return behind + keyboard + far_motor()


def roll_off(x):
    return signal.sosfilt(signal.butter(12, 16820, fs=SR, output="sos"), x)


def record(dry):
    dull = signal.sosfilt(signal.cheby2(8, 24, 16150, fs=SR, output="sos"), dry)
    return roll_off(dull)


dry = scene()
out = record(dry)
generate_wav(out)
```